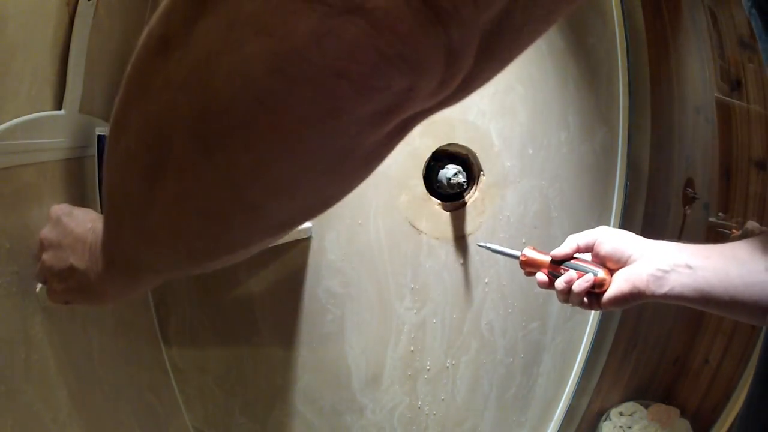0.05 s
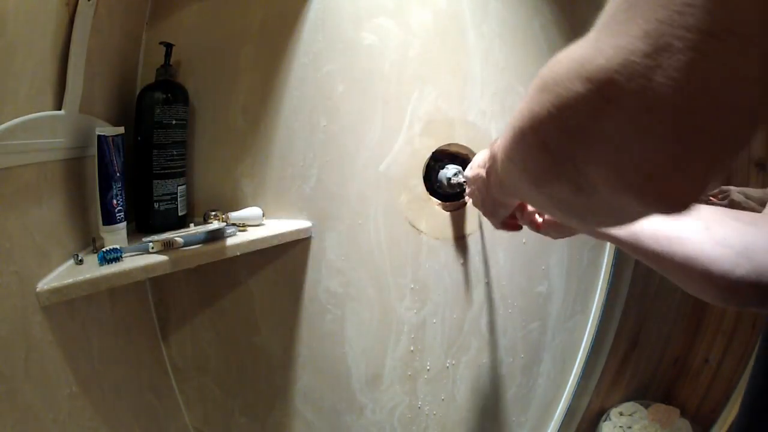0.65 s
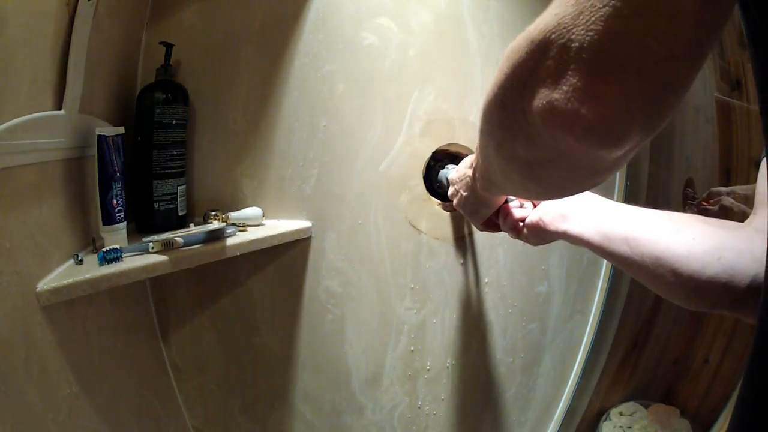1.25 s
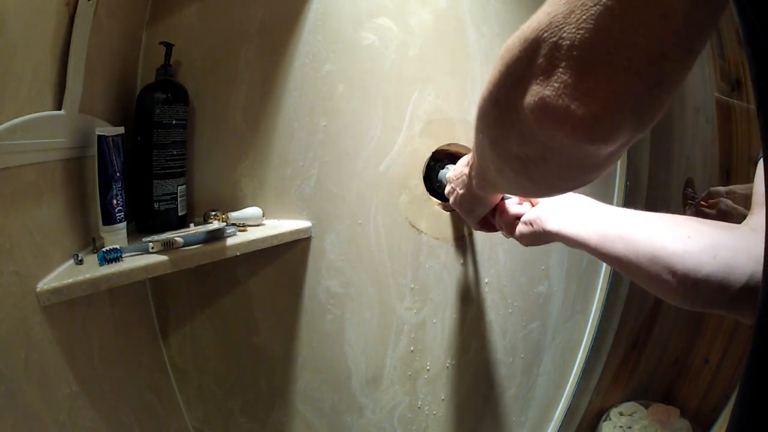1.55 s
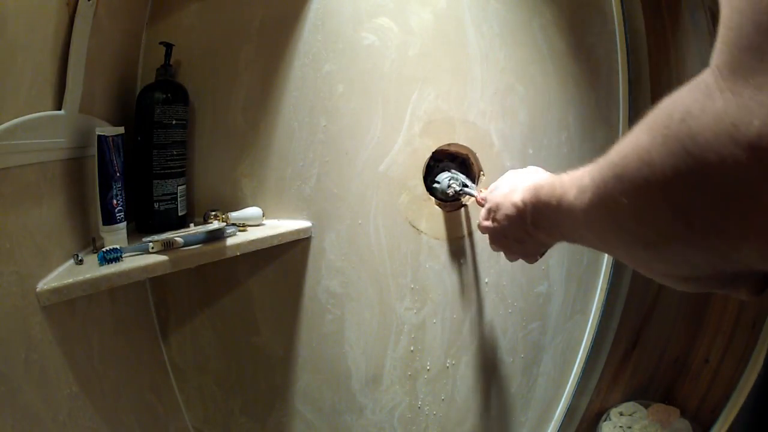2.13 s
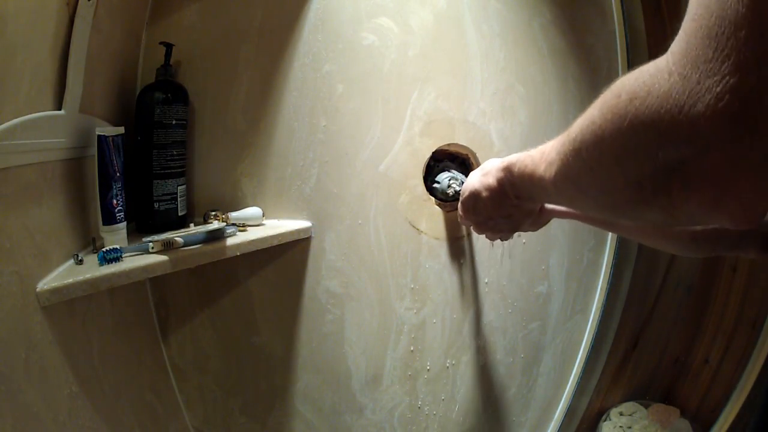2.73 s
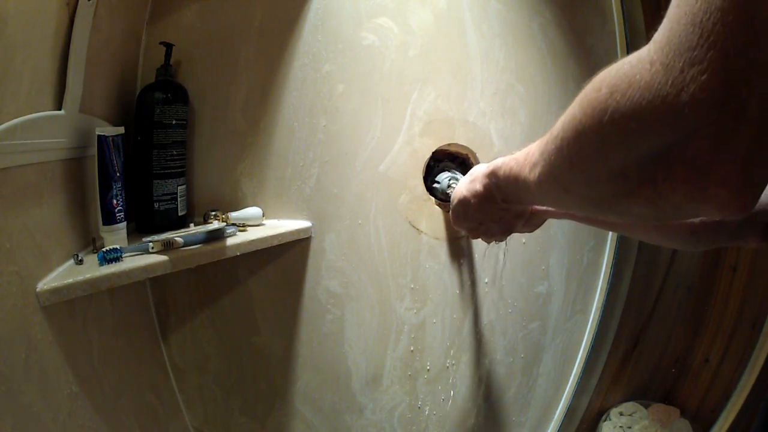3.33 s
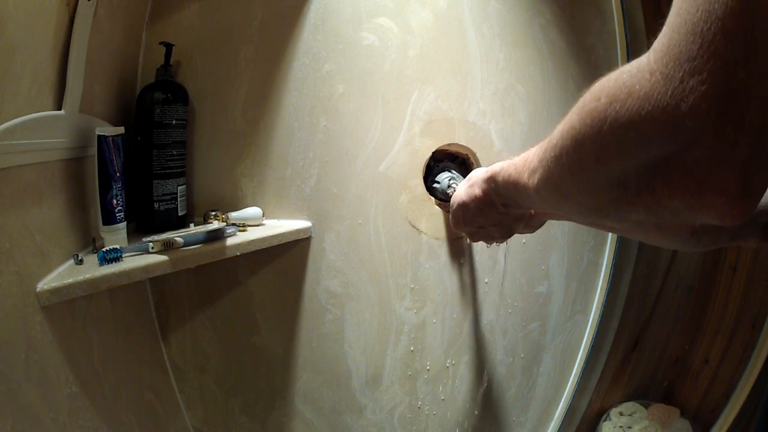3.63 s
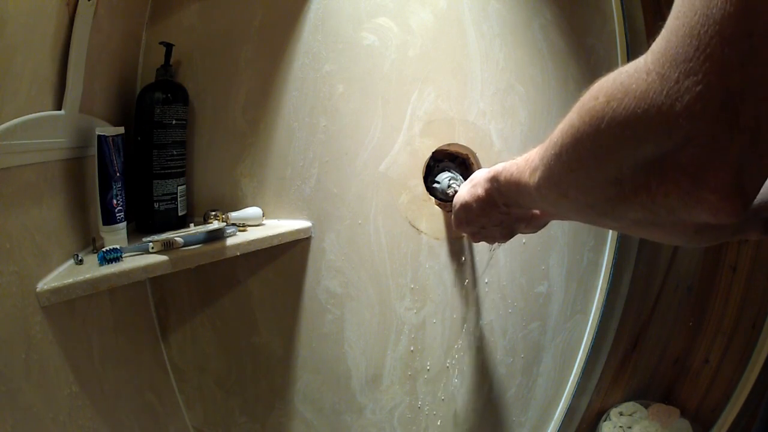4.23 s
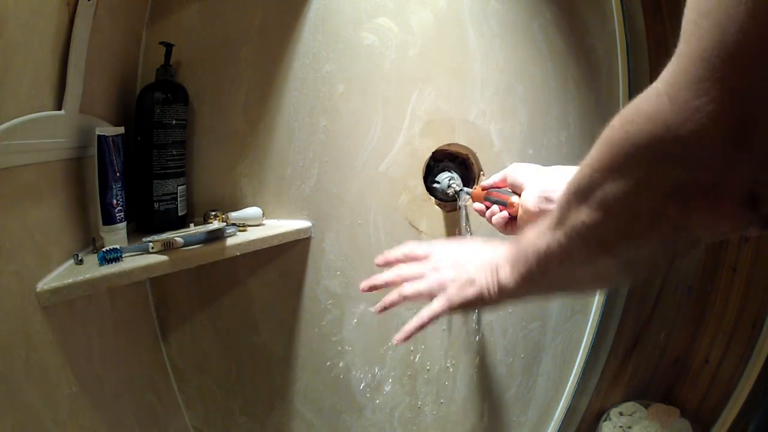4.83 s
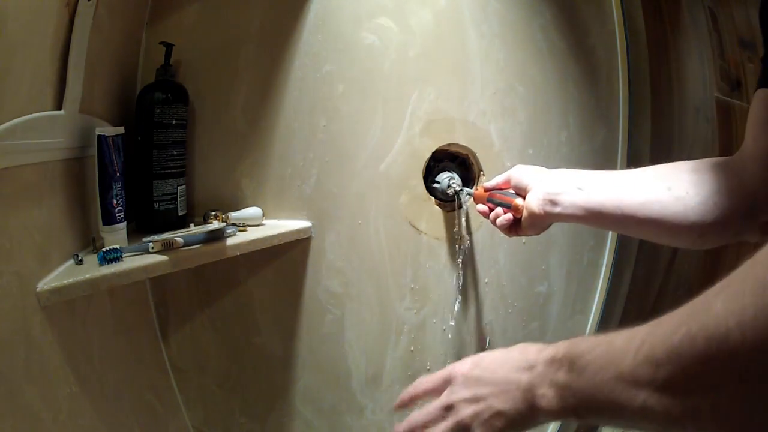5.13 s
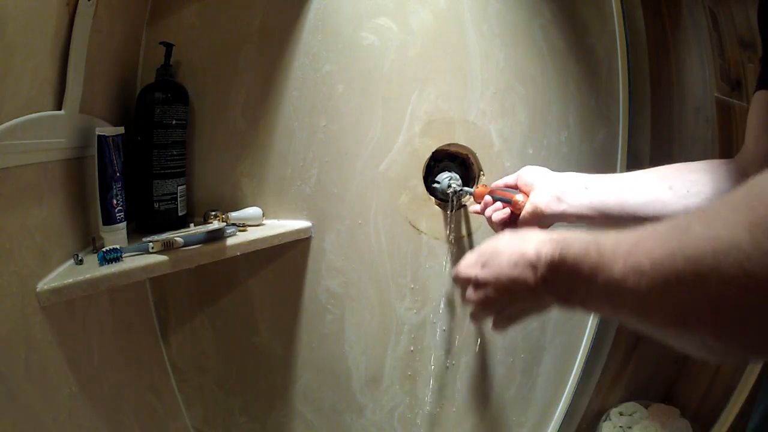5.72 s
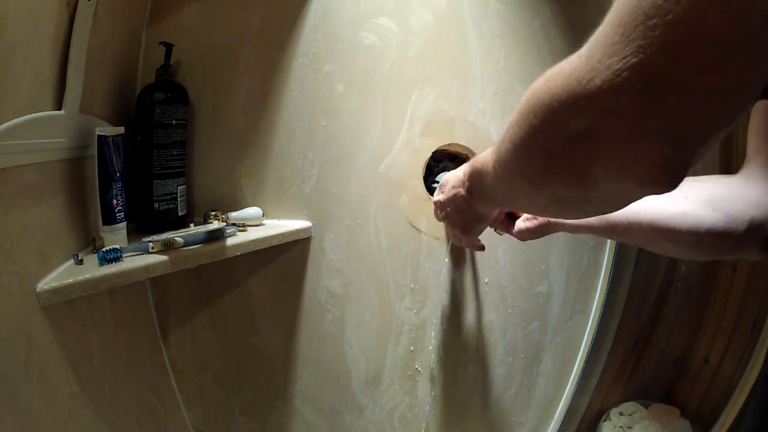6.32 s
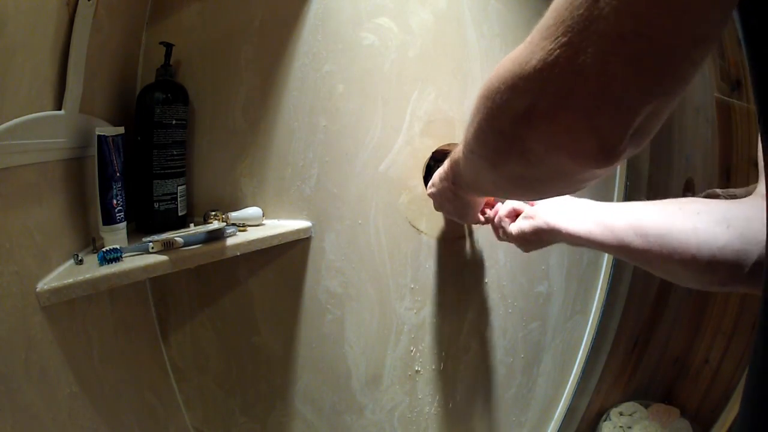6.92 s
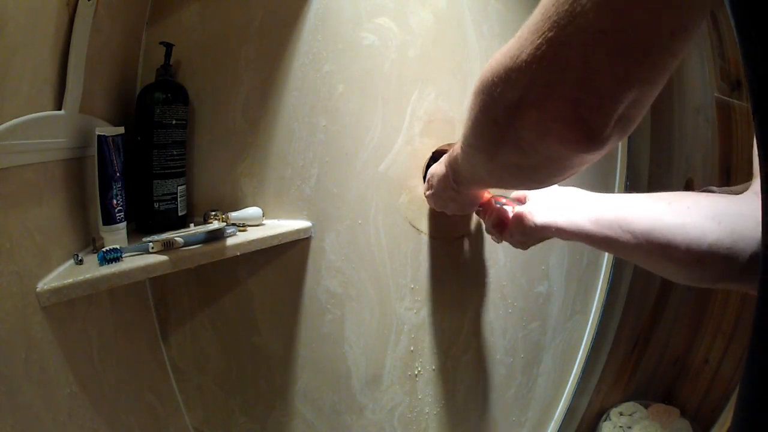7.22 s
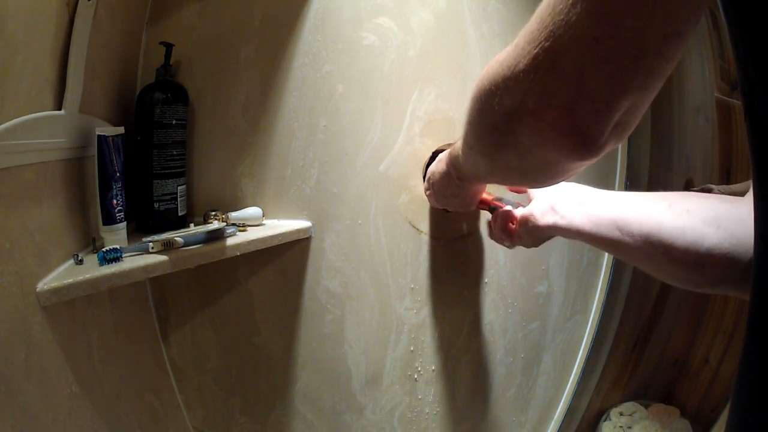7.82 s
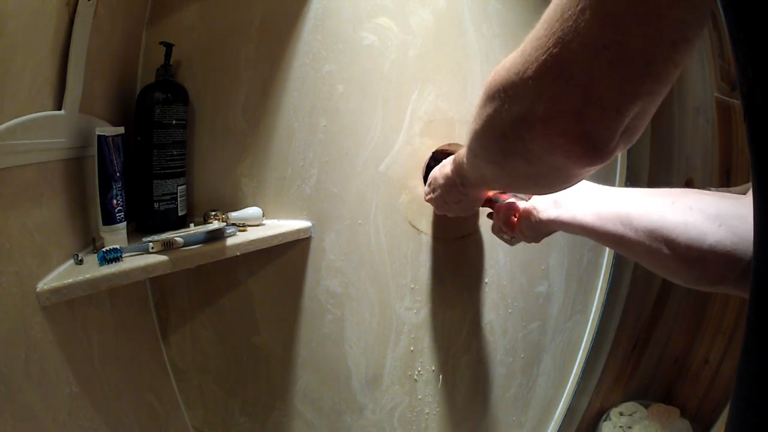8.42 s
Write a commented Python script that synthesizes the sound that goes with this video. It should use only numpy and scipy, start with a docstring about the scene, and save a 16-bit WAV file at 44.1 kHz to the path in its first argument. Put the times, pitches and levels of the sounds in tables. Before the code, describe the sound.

A small hard part clacks on a shelf right at the start, over the low steady rush of a house. From about 1.4 seconds come a few faint dull bumps and a slight tool scrape. At 2 seconds a pipe jolts hard against the shower wall panel with a hollow boom, the loudest moment. Water starts leaking, trickling, plopping and smacking on a hollow tray, while quick, uneven knocks chatter at the valve until about 4.5 seconds. A faint low pipe hum wavers underneath. The splatter is strongest around 4.5 to 6 seconds, with sparser knocks and two soft bumps just after 5. A firmer knock and thud come near 7 seconds, then the water thins to drips. The tool tinks once near 8 seconds, followed by a faint scrape and light knocks. Everything is close, with short reflections from small bathroom walls.

```python
"""A small part clacks on a shelf, a few dull bumps follow, then a pipe jolts hard against a wall panel.
A shower valve is being worked loose in a small bathroom, heard from one microphone close by.
The pipe knocks, chatters and hums while escaping water trickles, smacks and bubbles on the hollow tray.
The tool scrapes on the valve and tinks once near the end. Hard walls answer closely,
and the low rush of the house lies under it all."""
import sys
import numpy as np
from scipy import signal
from scipy.fft import rfft, irfft, next_fast_len
from scipy.io import wavfile
from scipy.ndimage import uniform_filter1d, minimum_filter1d, map_coordinates

SR = 44100
rng = np.random.default_rng(int(sys.argv[2]) if len(sys.argv) > 2 else 0)


def master(y):
    """Save y as 16-bit WAV."""
    cut = np.clip(np.atleast_2d(y).T, -1, 1)
    pcm = np.round(cut * 32767)  # scale
    wavfile.write(sys.argv[1], SR, pcm.astype(np.int16))


N = 373086
TIME = np.arange(N) / SR
LENGTH = 16384  # samples in one short sound
AGE = np.arange(LENGTH) / SR
LEAK_S = 1.98  # the valve starts to leak
PUDDLE_HZ = 1521  # typical pitch of a drip's bubble


def amp(db):
    """Decibels to gain."""
    return 10 ** (np.asarray(db) / 20)


def unit(x):
    """Scale to rms 1."""
    return x / np.sqrt(np.mean(x ** 2) + 1e-20)


def sized(x):
    """Scale a short sound to energy 1."""
    return x / (np.linalg.norm(x) + 1e-12)


def along(points, hz):
    """Read (freq_hz, value) points on a log frequency axis."""
    freqs, values = np.transpose(points)
    return np.interp(np.log(hz + 1), np.log(freqs + 1), values)


def add(track, start_s, sound):
    """Mix a sound into the track."""
    part = track[max(round(start_s * SR), 0):][:len(sound)]
    part += sound[:len(part)]


def coloured(x, points):
    """Causal filter with the gain of the (freq_hz, gain_db) points."""
    size = 2 * next_fast_len(x.shape[-1] // 2 + LENGTH // 4)
    cepstrum = irfft(np.log(amp(along(points, np.fft.rfftfreq(size, 1 / SR)))))
    cepstrum[1:size // 2] *= 2  # fold to minimum phase
    cepstrum[size // 2 + 1:] = 0
    return irfft(rfft(x, size) * np.exp(rfft(cepstrum)))[..., :x.shape[-1]]


def resonated(x, peaks):
    """Pass x through (pitch_hz, width_hz, gain_db) resonances of alternating sign."""
    size = 2 * next_fast_len(x.shape[-1] // 2 + LENGTH // 4)
    f = np.fft.rfftfreq(size, 1 / SR)
    response = sum((-1) ** k * amp(db) * 1j * f * width / (hz * hz - f * f + 1j * f * width)
                   for k, (hz, width, db) in enumerate(sorted(peaks)))
    return irfft(rfft(x, size) * response)[..., :x.shape[-1]]


def ringing(modes):
    """A struck body: one dying sine for each (pitch_hz, level_db, t60_s) mode."""
    return sum(amp(db - 60 * AGE / t60) * np.sin(2 * np.pi * hz * AGE) for hz, db, t60 in modes)


# The bathroom's reverberation: freq_hz, t60_s
ROOM_DECAY = [(150, 0.56), (600, 0.31), (3000, 0.21), (8000, 0.27), (15000, 0.024)]
def stall(count, near_db, far_db, near_t60_s=0.07):
    """Room responses from one spot: direct sound, shared quick echoes, then each its own diffuse tail."""
    hz, t, spectra = signal.stft(rng.standard_normal((count, LENGTH)), SR, nperseg=256)
    decay = amp(-60 * t / along(ROOM_DECAY, hz)[:, None])
    tails = signal.istft(spectra * decay, SR, nperseg=256)[1][:, :LENGTH]
    echoes = sized(rng.standard_normal(LENGTH) * amp(-60 * AGE / near_t60_s))
    return np.array([(AGE == 0) + amp(near_db) * echoes + amp(far_db) * sized(tail) for tail in tails])


def blows(count, contact_s, grit_db, near_db, far_db):
    """Impulses, each with a burst of contact grit, heard through the room."""
    pressed = AGE / np.reshape(contact_s, (-1, 1))
    grit = rng.standard_normal((count, LENGTH)) * np.exp(-pressed) * (1 - np.exp(-2 * pressed))
    grit /= np.linalg.norm(grit, axis=1, keepdims=True)
    pushes = (AGE == 0) + amp(np.reshape(grit_db, (-1, 1))) * grit
    return signal.fftconvolve(pushes, stall(count, near_db, far_db), axes=1)[:, :LENGTH]


def patter(sounds, rate_hz, spread_db, uneven=1):
    """A run of small events at gaps uneven by 0-1; each plays one of the sounds at a random level."""
    gap, loud, choice = rng.random((2048, 3)).T
    starts = (np.cumsum(1 + uneven * (2 * gap - 1)) / rate_hz * SR).astype(int)
    which = (choice * len(sounds)).astype(int)
    kept = starts < N
    impulses = np.zeros((len(sounds), N))
    impulses[which[kept], starts[kept]] = amp(spread_db * (2 * loud[kept] - 1))
    return signal.fftconvolve(impulses, sounds, axes=1)[:, :N].sum(0)


# Room tone, all around the microphone: freq_hz, gain_db
HOUSE_COLOUR = [(15, -2.5), (50, 1.5), (170, -3), (300, -10), (700, -20), (2000, -26.5), (5000, -31.5),
                (11000, -34)]
def house_air():
    """The low steady rush of the house."""
    return amp(-54.5) * unit(coloured(rng.standard_normal(N), HOUSE_COLOUR))


# Tone of a hit on the shelf: freq_hz, gain_db
SHELF_COLOUR = [(500, -0.5), (3800, -2.5), (4600, -2), (5500, -4.5), (15000, -13)]
def shelf_clack():
    """A small hard part rattles briefly as it is set down."""
    track = np.zeros(N)
    hit, = blows(count=1, contact_s=0.0084, grit_db=12, near_db=-3, far_db=-4.5)
    add(track, start_s=0.1372, sound=amp(-11.5) * sized(coloured(hit, SHELF_COLOUR)))
    return track


# An arm against the stall, heard dry: start_s, peak_db
ARM_BUMPS = [(5.172, -34), (5.318, -32)]
def arm_bumps(pitch_hz=104, swell_s=0.0037):
    """Soft pushes on the stall: a few low cycles and no ring."""
    track = np.zeros(N)
    swell = AGE / swell_s
    bump = swell * np.exp(1 - swell) * np.sin(2 * np.pi * pitch_hz * AGE)
    for start_s, db in ARM_BUMPS:
        add(track, start_s, amp(db) * bump)
    return track


# Strokes of the tool at the valve: start_s, length_s, level_db
TOOL_STROKES = [(1.798, 0.1, -50), (8.093, 0.14, -47.5)]
# Tone of the rubbing: freq_hz, gain_db
RUB_COLOUR = [(300, 16), (1000, 1), (2500, 3), (4000, -29), (12000, -8)]
def tool_scrapes():
    """The tool slips over the valve in tiny catches that swell and fade."""
    strokes = sum(amp(db) * np.sin(np.pi * np.clip((TIME - start_s) / length_s, 0, 1))
                  for start_s, length_s, db in TOOL_STROKES)
    catches = blows(count=6, contact_s=0.003, grit_db=10, near_db=-2, far_db=-2)
    return strokes * unit(coloured(patter(catches, rate_hz=220, spread_db=4), RUB_COLOUR))


# Modes of the steel tool: pitch_hz, level_db, t60_s
TOOL_MODES = [(5210, 7, 0.029), (6930, 3.5, 0.034)]
def tool_tink():
    """The tool rings from one light touch on the valve stem."""
    track = np.zeros(N)
    room, = stall(count=1, near_db=-1, far_db=-7)
    tink = signal.fftconvolve(ringing(TOOL_MODES), room)
    add(track, start_s=7.9437, sound=amp(-13) * sized(tink))
    return track


# Hum from inside the pipe: time_s, level_db
HUM_LEVELS = [(2.3, -62), (2.67, -47.5), (4.25, -71), (5.31, -49.5), (6.45, -60), (7.0, -49), (8.4, -47.5)]
def pipe_hum(leak_hz=168.7, sag_hz_per_s=2.7):
    """Flow keeps a low, wavering hum going in the pipe; its pitch sinks slowly."""
    level_db = np.interp(TIME, *np.transpose(HUM_LEVELS))
    pitch_hz = leak_hz - sag_hz_per_s * (TIME - LEAK_S)
    waver = map_coordinates(rng.standard_normal(128), [TIME * 9])  # nine random values a second
    phase = 2 * np.pi * np.cumsum(pitch_hz) / SR + 0.44 * waver
    return amp(level_db + 3.2 * waver) * np.sin(phase)


# Tick of a drop hitting water: pitch_hz, width_hz, gain_db
DROP_TICK = [(2770, 240, -0.5), (9280, 170, -4.5), (10330, 180, -4), (13700, 690, -4.5)]
def bubble(hz, room, cycles, rise):
    """A drop ticks and its bubble rings, rising in pitch. Low-pitched bubbles barely tick."""
    life = AGE * hz / cycles
    pitch_hz = hz * (1 + rise * (np.minimum(life, 2) - 1))
    ring = np.sin(2 * np.pi * np.cumsum(pitch_hz) / SR) * np.exp(-life) * (1 - np.exp(-2 * life))
    tick = amp(-3.5) * min(hz / PUDDLE_HZ, 1) ** 2 * sized(resonated(room, DROP_TICK))
    return sized(signal.fftconvolve(ring, room)[:LENGTH]) + tick


def plops(hz, spread, cycles, count=16):
    """A set of bubbles scattered around one pitch, with more room than direct sound."""
    pitches = hz * np.exp(spread * rng.standard_normal(count))
    rooms = stall(count, near_db=2.5, far_db=9)
    return np.array([bubble(pitch, room, cycles, rise=0.031) for pitch, room in zip(pitches, rooms)])


# Strength of the leak: time_s, level_db
LEAK_FLOW = [(2.2, -49), (3.75, -51.5), (4.81, -42.5), (4.93, -47.5), (6.53, -51), (6.9, -47.5),
             (7.42, -61), (8.4, -66.5)]
# Modes of the hollow tray underfoot: pitch_hz, width_hz, gain_db
TRAY_MODES = [(81, 34, -4.5), (189.6, 18, 2.5), (237.4, 16.5, -4), (304.6, 16, -2), (418, 160, -15)]
# Tone of fine spray landing: freq_hz, gain_db
SPRAY_COLOUR = [(200, -19), (600, -5), (2000, -4.5), (4800, -12), (11000, -12.5)]
# Tone of water smacking the tray, in spatters and splats alike: freq_hz, gain_db
SMACK_COLOUR = [(300, -1.5), (1200, -11.5), (2500, -2.5), (3700, 1), (5000, -0.5), (7300, 4.5),
                (11000, -15), (15000, -18)]
def trickle(full_flow_db=-46.5, opening_s=0.017):
    """Drips, gurgles and spray grow louder with the flow; the tray drums steadily and the pipe hums."""
    flow_db = np.interp(TIME, *np.transpose(LEAK_FLOW)) - full_flow_db
    drip_db = -52.5 + 0.68 * flow_db
    spray_db = -51.5 + 1.2 * flow_db  # spray gains faster than dripping
    opened = np.clip((TIME - LEAK_S) / opening_s, 0, 1)
    bursts = blows(count=8, contact_s=0.0022, grit_db=14, near_db=-4, far_db=-5.5)
    spatters = patter(bursts, rate_hz=26, spread_db=5)
    gurgles = patter(plops(hz=760, spread=0.3, cycles=1.2), rate_hz=24, spread_db=4.5)
    puddle = patter(plops(hz=PUDDLE_HZ, spread=0.06, cycles=4.5), rate_hz=16, spread_db=3, uneven=0.5)
    droplets = patter(bursts, rate_hz=200, spread_db=3)
    drips = amp(drip_db) * unit(puddle)
    gurgling = amp(0.63 * drip_db - 24) * unit(gurgles)
    coarse_spray = amp(spray_db) * unit(coloured(spatters, SMACK_COLOUR))
    fine_spray = amp(spray_db - 0.5) * unit(coloured(droplets, SPRAY_COLOUR))
    drumming = amp(-50) * unit(resonated(droplets, TRAY_MODES))
    return opened * (drips + gurgling + coarse_spray + fine_spray + drumming + pipe_hum())


# Large drops, heard mostly off the stall walls: start_s, relative_db, pitch_hz
LARGE_DROPS = [(2.215, -29.5, 1640), (2.38, -33, 1530), (2.919, -36, 1530), (3.231, -35, 1510),
               (3.382, -36.5, 1760), (3.510, -36, 1500), (3.585, -37, 1010), (3.609, -41.5, 1550),
               (3.926, -30, 1670), (4.472, -41, 1630), (4.674, -49, 1500), (4.76, -32, 1630),
               (4.894, -30.5, 1550), (4.998, -35, 764), (5.249, -37, 1550), (5.336, -35.5, 1410),
               (5.481, -42, 1460), (5.576, -32, 706), (5.71, -31, 1440), (5.824, -29, 1050),
               (5.931, -34.5, 1570), (7.248, -31, 700), (7.667, -39, 1760), (8.023, -43, 1330)]
def large_drops():
    """Each large drop traps a bubble and plops."""
    track = np.zeros(N)
    rooms = stall(len(LARGE_DROPS), near_db=11, far_db=8.5)
    for (start_s, db, hz), room in zip(LARGE_DROPS, rooms):
        add(track, start_s, amp(db + 19) * bubble(hz, room, cycles=2.3, rise=0.048))
    return track


# Water smacking the tray, close to the microphone: start_s, relative_db
TRAY_SPLATS = [(2.5135, -30.5), (2.55, -37.5), (2.821, -20.5), (3.2006, -32), (3.7894, -31.5),
               (4.093, -30.5), (4.2186, -27.5), (4.2349, -26.5), (4.2634, -27.5), (4.5493, -21.5),
               (4.6377, -22), (4.734, -30), (4.8106, -24.5), (4.839, -22), (5.1283, -18.5), (5.1657, -25),
               (5.4207, -28), (5.4521, -26.5), (5.73, -27.5), (5.8862, -35.5), (6.385, -40.5),
               (6.472, -36.5), (6.8862, -34), (7.2862, -39), (7.3376, -39)]
def tray_splats():
    """Gobs of water burst into a few milliseconds of spray, each strongest around its own pitch."""
    track = np.zeros(N)
    bursts = blows(len(TRAY_SPLATS), contact_s=0.0035, grit_db=7, near_db=-4, far_db=-3)
    for (start_s, db), smack in zip(TRAY_SPLATS, coloured(bursts, SMACK_COLOUR)):
        focus_hz = 5000 * np.exp(0.16 * rng.normal())
        focus = resonated(smack, [(focus_hz, 1800, 0)])
        add(track, start_s, amp(db + 22.5) * sized(sized(smack) + 1.2 * sized(focus)))
    return track


# Dull blows on the stall's wall panel: start_s, relative_db, body_trim_db
PANEL_THUDS = [(1.366, -39.5, -16), (1.505, -44.5, -10), (1.58, -40, -16), (1.816, -39, -14.5),
               (2.016, -31, 5.5), (2.023, -13, -12), (2.053, -32.5, -1), (2.128, -30, -17),
               (2.264, -47, -0.5), (6.941, -25.5, -26), (7.024, -30.5, -9), (8.105, -31.5, -15.5)]
# Modes of the panel: pitch_hz, level_db, t60_s
PANEL_MODES = [(87.6, 4.5, 0.22), (174, 14, 0.12), (221, -4.5, 0.66), (304, -10.5, 0.18), (387, -10, 0.11),
               (488, -3, 0.1), (529.4, -11, 0.18)]
# Hollow body of the wall: freq_hz, gain_db
WALL_COLOUR = [(120, -31), (300, 1.5), (520, 3), (720, -9), (1000, -14), (1500, -32), (4000, -32)]
def panel_thuds(attack_s=0.0069):
    """The jolting pipe and the hands push the wall panel, which booms in its low modes."""
    track = np.zeros(N)
    hits = blows(len(PANEL_THUDS), contact_s=0.003, grit_db=9, near_db=0, far_db=-4)
    boom = sized(ringing(PANEL_MODES) * (1 - np.exp(-AGE / attack_s)))
    for (start_s, db, body_trim_db), body in zip(PANEL_THUDS, coloured(hits, WALL_COLOUR)):
        add(track, start_s, amp(db + 23.5) * boom + amp(db + body_trim_db + 34) * sized(body))
    return track


# Knocks of pipe and valve, close by in the stall: start_s, relative_db
PIPE_KNOCKS = [(1.3631, -50), (1.503, -53.5), (2.0291, -26), (2.0447, -28.5), (2.0885, -25),
               (2.1317, -32.5), (2.1909, -38), (2.3068, -33), (2.3155, -26.5), (2.4207, -35),
               (2.607, -29.5), (2.752, -25), (2.8212, -25.5), (2.9524, -23), (3.037, -25.5), (3.11, -26),
               (3.2908, -28.5), (3.4026, -32), (3.7385, -35.5), (3.898, -32.5), (3.983, -35.5),
               (4.136, -31), (4.2187, -28.5), (4.3653, -36.5), (4.4501, -37.5), (4.9421, -25.5),
               (5.127, -30.5), (5.3563, -31), (5.8211, -36.5), (6.0166, -30.5), (6.125, -41),
               (6.6933, -33.5), (6.796, -33), (6.885, -38.5), (6.974, -24), (7.767, -35.5), (8.1309, -42.5),
               (8.1714, -44.5), (8.4268, -42)]
# Ring of the valve: pitch_hz, width_hz, gain_db
VALVE_MODES = [(2552, 450, 3), (2975, 360, 8), (1350, 1370, -7), (1865, 57, 1.5), (3430, 1570, -8.5),
               (5100, 560, -6.5)]
# Bright edge of a knock: pitch_hz, width_hz, gain_db
EDGE_MODES = [(6630, 900, 1), (9230, 380, 17), (13600, 560, 0), (15000, 290, 12)]
# Hollow body of a knock: freq_hz, gain_db
HOLLOW_COLOUR = [(120, -21), (300, 8), (500, 2), (750, 0), (1000, 6), (1800, -10.5), (3000, -19)]
def pipe_knocks(firm_db=-33, hardening_db_per_db=4.54):
    """Each knock rings the valve; weaker knocks are softer, longer contacts and sound more hollow."""
    track = np.zeros(N)
    above_firm_db = np.maximum(np.array(PIPE_KNOCKS)[:, 1] - firm_db, 0)
    softness = amp(-hardening_db_per_db * above_firm_db)
    contact_s = 0.0012 + 0.00375 * softness
    hits = blows(len(PIPE_KNOCKS), contact_s, grit_db=12 * softness, near_db=1, far_db=0)
    for (start_s, db), soft, hit in zip(PIPE_KNOCKS, softness, hits):
        modes = [(hz * (1 + 0.01 * rng.normal()), width_hz, gain_db + 2 * rng.normal())
                 for hz, width_hz, gain_db in VALVE_MODES]
        ring = sized(resonated(hit, modes))
        body = soft * sized(coloured(hit, HOLLOW_COLOUR))
        edge = amp(-4.5) * sized(resonated(hit, EDGE_MODES))
        click = amp(-15) * sized(hit)
        add(track, start_s, amp(db + 22.5) * (ring + body + edge + click))
    return track


def scene():
    """Everything that reaches the microphone, in mono."""
    foreground = shelf_clack() + arm_bumps() + pipe_knocks() + tray_splats() + large_drops()
    return (foreground + panel_thuds() + tool_scrapes() + tool_tink() + trickle() + house_air())[None]


def limited(x, ceiling_db, window_samples):
    """Turn the gain down around any peak that would pass the ceiling."""
    needed = np.minimum(1, amp(ceiling_db) / (np.abs(x) + 1e-9))
    return x * uniform_filter1d(minimum_filter1d(needed, window_samples), window_samples)


# Colour of the microphone port: freq_hz, gain_db
MIC_COLOUR = [(5000, -1), (5500, -5.5), (6000, -17), (6900, -4.5), (11000, -6), (12000, -10.5), (13300, -9),
              (15000, 0), (15500, -38)]
def record(dry):
    """The microphone port notches the treble, a limiter holds the big jolt, and the very top is cut."""
    held = limited(coloured(dry, MIC_COLOUR), ceiling_db=-12.3, window_samples=150)
    size = next_fast_len(N + LENGTH)
    passband = np.fft.rfftfreq(size, 1 / SR) < 16500
    return irfft(rfft(held, size) * passband, size)[..., :N]


dry = scene()
out = record(dry)
master(out)
```